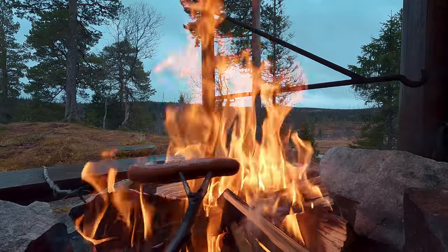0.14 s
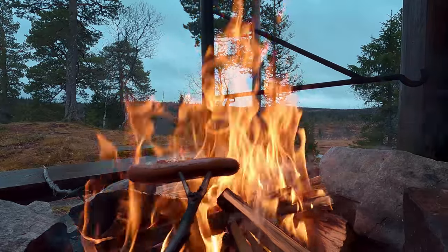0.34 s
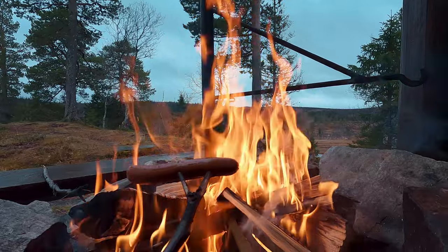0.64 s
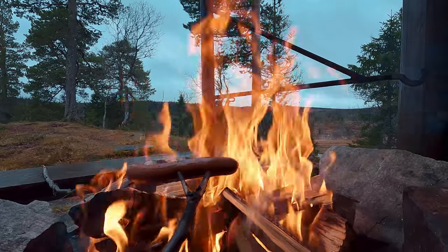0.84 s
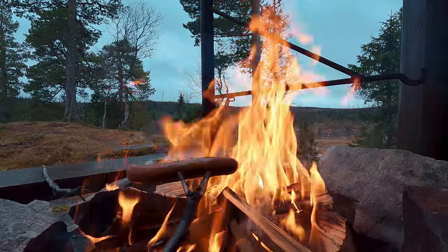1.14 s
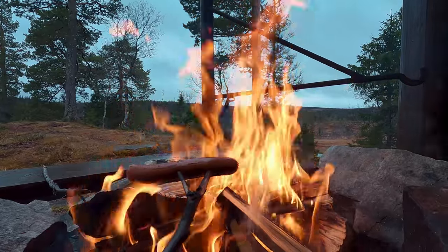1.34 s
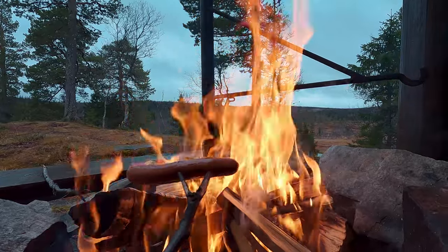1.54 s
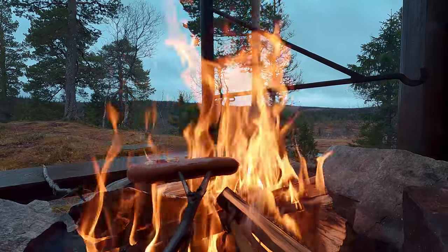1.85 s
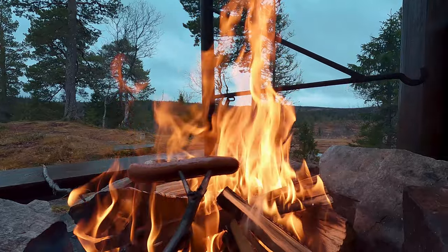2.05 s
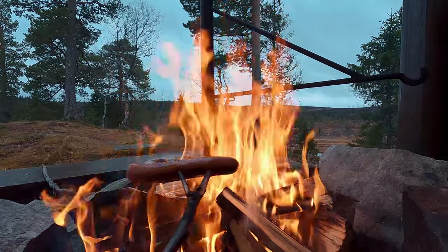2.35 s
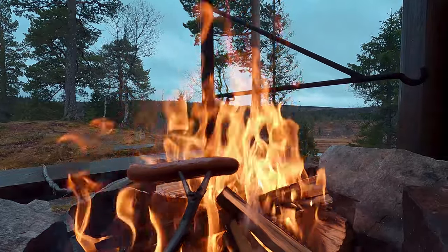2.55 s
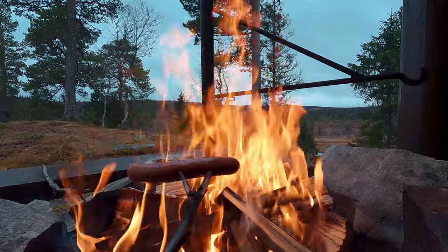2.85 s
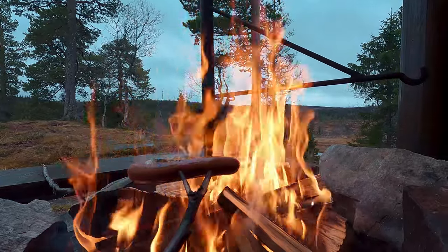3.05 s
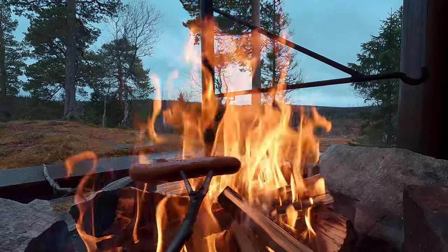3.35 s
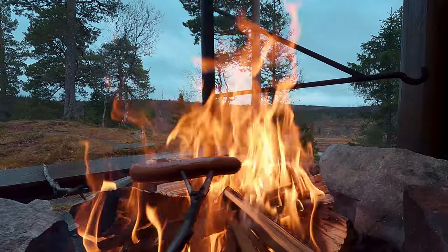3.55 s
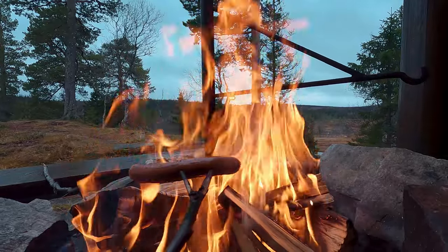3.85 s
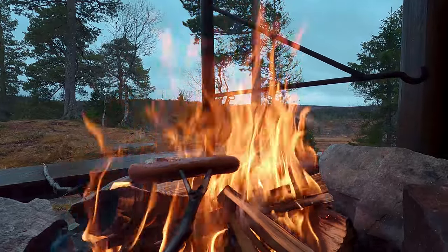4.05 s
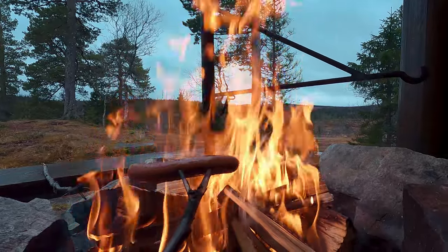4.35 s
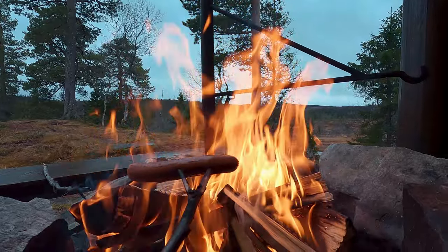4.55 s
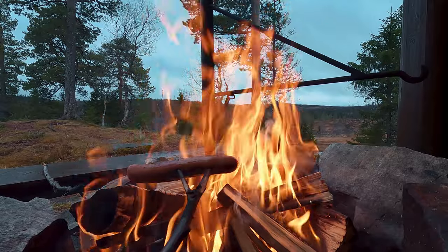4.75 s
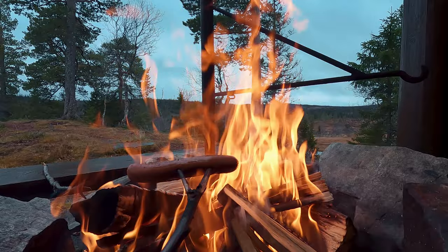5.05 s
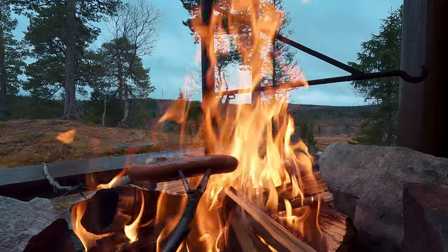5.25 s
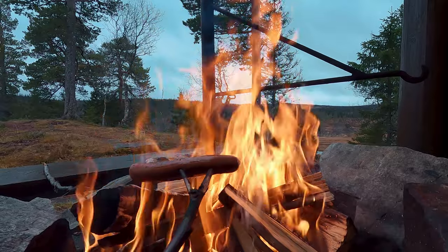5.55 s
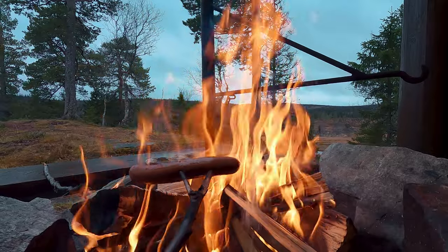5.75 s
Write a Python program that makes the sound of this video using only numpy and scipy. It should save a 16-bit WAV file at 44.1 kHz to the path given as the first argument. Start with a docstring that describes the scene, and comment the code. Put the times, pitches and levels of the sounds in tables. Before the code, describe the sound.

A wood fire burns close to the microphone in an outdoor stone pit. A soft, deep billowing rumble and low flame flutter run throughout, with faint wide sap hiss, a barely perceptible very high whine and a constant bed of tiny ticks. Small pops, some dull and some bright, come about eleven times a second. Sharp snaps crowd the first 0.2 s, then recur at 0.45, 0.64 and in a tight cluster around 1.0-1.1 s with a short sputtering gas spurt. Sparser cracks follow, with faint spurts near 1.5, 2.15 and 3.6 s. A strong snap hits at 2.5 s and by far the loudest, sharp and pitched, at 3.1 s. From 3 s everything fades gradually, though cracks continue, notably at 4.0-4.15, woody knocks near 4.5, a bright snap at 4.8 and a few around 5.05 s, reaching silence at 6 s. Quick stone reflections and a faint tree echo follow the cracks.

```python
"""Outdoor wood fire, close by

A wood fire burns in a stone pit: low flame rumble and flutter from shaped noise, sap hiss from wide noise.
Ticks, pops and loud snaps are short minimum-phase pulses; gas spurts are sputtering, decaying noise.
Delayed copies and decaying noise tails throw the cracks back from stones, logs, ground and trees.
A faint thin whine lies on top; everything fades from 3 s on."""
import sys
import numpy as np
from scipy import signal
from scipy.fft import rfft, irfft
from scipy.io import wavfile
from scipy.ndimage import uniform_filter1d

SR = 44100
rng = np.random.default_rng(int(sys.argv[2]) if len(sys.argv) > 2 else 0)


def wav_record(signal):
    """Record a signal, one row per channel, as 16-bit PCM in the file named by sys.argv[1]."""
    frames = np.transpose(np.atleast_2d(signal))
    bounded = np.clip(frames, -1, 1)
    # unit amplitude maps onto the largest positive 16-bit level
    quanta = np.round(bounded * 32767).astype(np.int16)
    wavfile.write(sys.argv[1], SR, quanta)


N = 260182
TIME_S = np.arange(N) / SR

# Loud wood cracks: (time [s], strength [dB], low knock [dB], mid bite [dB], top fizz [dB],
# pitch [Hz], amplitude of a second pulse one pitch period later [0-1])
SNAPS = [(0.023, -21.5, 5, 4, 0, 3975, 0.3), (0.1035, -11.5, 1, 3.5, -1, 4430, 0.17),
         (0.1413, -18, 10, -1, 7, 5650, 0.2), (0.1507, -14.5, 3.5, 1, -0.5, 2300, 0.15),
         (0.1995, -12, -2.5, -2, -5.5, 4975, 0.1), (0.4074, -24.5, -6, 1, 1, 4000, 0.3),
         (0.4461, -14.5, -9, -1, -4.5, 3900, 0.1), (0.6367, -10.5, -5.5, -0.5, -8, 2040, 0.1),
         (0.652, -24, 12, 10, 2, 4150, 0.2), (0.7396, -23, -1, 0, 0.5, 3225, 0.2),
         (0.8034, -19, 13, 11, 9, 2150, 0.35), (0.915, -20.5, -1, 5, -5, 3575, 0.05),
         (1.009, -14, 0, 6, 3, 3975, 0), (1.026, -17, -4, -9, -5, 2775, 0.2),
         (1.0625, -18.5, -10, -12, -1, 4200, 0.1), (1.0694, -15.5, -6, 6, -5, 2200, 0.5),
         (1.0865, -18, 7.5, 3.5, -1, 2200, 0.25), (1.413, -21, 8, 0, 0.5, 2400, 0.3),
         (1.4768, -20.5, -2, -2.5, 2, 2275, 0.1), (1.7393, -20.5, 6.5, 1, 2, 2525, 0),
         (1.8722, -24, 9, 5, 3, 2300, 0.3), (1.8997, -23.5, 4, -1, 16, 5025, 0.3),
         (2.1493, -16.5, -2.5, -3.5, -10.5, 1925, 0.06), (2.1914, -20.5, -2, -10, -9, 2925, 0.2),
         (2.214, -21, -8, -2, -5, 4375, 0.4), (2.282, -22, -7, 5, -3, 5025, 0.34),
         (2.4392, -22.5, 1, 4.5, 5, 5500, 0.1), (2.4986, -5, -9.5, -5.5, -9.5, 2090, 0.14),
         (2.7717, -12, -6.5, -4.5, -9, 5975, 0.03), (2.9742, -14.3, -6, 1.5, -5, 3430, 0.05),
         (3.05, -18, -20, -3, 1, 5975, 0.1), (3.0993, 4.5, -6.5, -4, -8, 3684, 0.76),
         (3.602, -19.5, -8, -3, 1, 3275, 0.2), (3.6252, -14, -14, -9, -0.5, 5975, 0.14),
         (3.7826, -20.5, -7, -2, -8, 5975, 0.2), (3.8308, -13.5, 9, 9, 5, 2570, 0.3),
         (4.0216, -8, -5.5, -4, -7, 2420, 0.4), (4.066, -19.5, -2, 4, 1, 3125, 0.2),
         (4.112, -10.5, -10.5, -3.5, -3.5, 4580, 0.2), (4.1514, -3.5, -2.5, -5.5, -5, 4325, 0.07),
         (4.2024, -19.5, 4, 2, -1, 2475, 0.2), (4.2713, -21, -7, -9, -5, 4860, 0.1),
         (4.3384, -23.5, 9, 9, -6, 2525, 0.5), (4.4738, -15.5, 26.5, 18, 0, 2500, 0.2),
         (4.4973, -16, 28.5, 17, -8, 2725, 0.35), (4.6696, -16, -4, -5, -7, 2140, 0.14),
         (4.7891, -4.5, -2.5, 4.5, 4, 3220, 0.26), (4.9871, -23, -1, -6, -0.5, 2254, 0.3),
         (5.0532, -12.5, 2, 1.5, 0, 2925, 0.3), (5.0621, -9.5, -5, -7, -13, 2125, 0.36),
         (5.1055, -15, -10.5, -8, -8.5, 2125, 0.2), (5.1643, -21, -0.5, 5, 4, 4175, 0.1),
         (5.412, -12, -7, 1, -6, 5100, 0.07), (5.6255, -10.5, -7, -6, -8.5, 2125, 0.16)]
# Noise colour of the deep billow: (frequency [Hz], density [dB per Hz])
BILLOW_COLOUR = [(14, -23.5), (22, -5), (30, -0.5), (55, 0.5), (78, -2.5), (95, 1), (120, -7), (150, -24),
                 (220, -49)]
# Noise colour of the flame flutter: (frequency [Hz], density [dB per Hz])
FLUTTER_COLOUR = [(80, -19.5), (115, -3.5), (150, -0.5), (240, -6), (320, -9.5), (450, -13.5), (700, -20),
                  (1200, -24.5), (2000, -29), (4000, -38)]
# Noise colour of boiling sap: (frequency [Hz], density [dB per Hz])
HISS_COLOUR = [(700, -21), (1500, -0.5), (3000, 1.5), (7000, 0.5), (15000, -3), (16000, -4.5)]
# Base spectrum of cracking wood: (frequency [Hz], level [dB])
WOOD_COLOUR = [(100, -27.5), (250, -9), (450, 1.5), (750, -4), (1100, 2), (2000, -0.5), (3000, -1.5),
               (4300, -1), (5300, -0.5), (7000, -0.5), (10000, 0), (13500, 0), (15000, -2), (16500, -10.5)]
# Tone of the scattered echoes: (frequency [Hz], level [dB])
ECHO_COLOUR = [(300, -4), (2000, -3), (4000, 0), (7300, -.5), (14500, -3.5), (16000, -8)]
# Bounces off the nearest stones: (delay [s], level [dB])
BOUNCES = [(.0027, -15.5), (.0034, -18)]
# Centres of a crack's knock, bite, core and fizz: (frequency [Hz])
CRACK_BANDS_HZ = [1200, 3700, 7000, 12000]
# Gas spurting from a freshly split log: (start [s], length [s], level [dB])
SPURTS = [(1.01, 0.19, -57), (1.474, 0.15, -60), (2.154, 0.1, -58), (3.616, 0.11, -59)]
# Noise colour of the spurts: (frequency [Hz], density [dB per Hz])
SPURT_COLOUR = [(2000, -8), (4200, -8.5), (5500, -9), (9500, -1.5), (12500, -10), (16000, -10)]

BILLOW_DB, FLUTTER_DB, HISS_DB, TICKS_DB = -42.5, -49.5, -63, -64
POPS_PER_S, POP_LOW_HZ, POP_HIGH_HZ = 11, 1980, 5990
CUTOFF_HZ = 16000


def from_db(db):
    """Decibels to gain."""
    return 10 ** (np.asarray(db) / 20)


def rms_one(x):
    """Scale to an rms of 1."""
    return x / np.sqrt(np.mean(x ** 2) + 1e-20)


def at_hz(points, hz, outside=None):
    """Read a spectrum along a log-frequency axis."""
    knots_hz, db = np.transpose(points)
    return np.interp(np.log(np.maximum(hz, 1)), np.log(knots_hz), db, outside, outside)


def noise(spectrum):
    """Noise of the given colour, rms 1."""
    gain = from_db(at_hz(spectrum, np.fft.rfftfreq(N, 1 / SR), outside=-np.inf))
    white = rng.standard_normal(N)
    return rms_one(irfft(rfft(white) * gain, N))


def drift(rate_hz):
    """Random wander, rms 1: flat from 0.5 Hz to the rate, weaker up to twice that."""
    return noise([(.5, 0), (rate_hz, 0), (2 * rate_hz, -10)])


def steadied(x, span_s):
    """Even out slow swells by dividing by the running rms."""
    power = uniform_filter1d(x ** 2, max(int(span_s * SR), 2))
    return x / np.sqrt(power + 1e-12)


def flames(surge_db, lick_db):
    """Hot gas billows deeply; the tongues of flame flutter above that."""
    billow_gain = from_db(BILLOW_DB + surge_db * drift(6))
    billow = billow_gain * steadied(noise(BILLOW_COLOUR), span_s=.3)
    flutter_gain = from_db(FLUTTER_DB + lick_db * drift(16))
    flutter = flutter_gain * noise(FLUTTER_COLOUR)
    return billow + flutter


def sap_hiss(swell_db):
    """Boiling sap hisses as wide noise that swells slightly."""
    return from_db(HISS_DB + swell_db) * noise(HISS_COLOUR)


def whine(centre_hz, width_hz, db):
    """Thin steady noise band at the very top."""
    edges_hz = [centre_hz - width_hz / 2, centre_hz + width_hz / 2]
    narrow = signal.butter(1, edges_hz, "band", fs=SR, output="sos")
    return from_db(db) * rms_one(signal.sosfilt(narrow, rng.standard_normal(N)))


def sudden(gain):
    """Minimum-phase spectra of these magnitudes: nothing sounds before the onset."""
    cepstrum = irfft(np.log(gain))
    half = cepstrum.shape[-1] // 2
    # fold the cepstrum onto positive time
    cepstrum[:, 1:half] *= 2
    cepstrum[:, half + 1:] = 0
    return np.exp(rfft(cepstrum))


def placed(pulses, times_s):
    """Lay each pulse on the timeline."""
    out = np.zeros(N + pulses.shape[1])
    starts = np.clip(times_s * SR, 0, N).astype(int)
    for pulse, start in zip(pulses, starts):
        out[start:start + len(pulse)] += pulse
    return out[:N]


def cracks(colours_db, pitch_hz, second, hollow_db):
    """One broadband pressure pulse per (knock, bite, fizz) row; a second give lends it a pitch."""
    size = 512
    hollow_octaves, tear_s, tear_share, tear_stages = 0.22, .00026, 0.58, 3
    count = len(colours_db)
    hz = np.fft.rfftfreq(size, 1 / SR)
    tint_db = np.array([at_hz(list(zip(CRACK_BANDS_HZ, (knock, bite, 0, fizz))), hz)
                        for knock, bite, fizz in colours_db])

    # the opened hollow resonates somewhere between bite and fizz
    hollow_hz = rng.uniform(CRACK_BANDS_HZ[1], CRACK_BANDS_HZ[-1], (count, 1))
    octaves_off = np.log2((hz + 1) / hollow_hz)
    tint_db = tint_db + hollow_db / (1 + (octaves_off / hollow_octaves) ** 2)
    tints = np.array([rms_one(tint) for tint in from_db(tint_db)])
    spectra = sudden(from_db(at_hz(WOOD_COLOUR, hz)) * tints)

    # tearing fibres smear the pulse without changing its colour: all-passes
    lags_s = tear_s * rng.uniform(.2, 1, (count, tear_stages))
    for lag_s in lags_s.T:
        late = np.exp(-2j * np.pi * np.outer(np.ceil(lag_s * SR) / SR, hz))
        spectra *= (late - tear_share) / (1 - tear_share * late)

    second = second[:, None]
    one_period_later = np.exp(-2j * np.pi * np.outer(1 / pitch_hz, hz))
    spectra *= (1 + second * one_period_later) / np.sqrt(1 + second ** 2)
    return irfft(spectra)


def ticks(per_s, spread_db, colour_db, knock_db, fizz_db, lowest_hz=1900):
    """Tiny cells burst at random, many faint, few sharper, each with its own colour and pitch; rms 1."""
    number = int(per_s * N / SR)
    when, size_draw, pitch_draw, second, *tints = rng.random((number, 7)).T
    colours_db = np.array([knock_db, 0, fizz_db]) + colour_db * (2 * np.transpose(tints) - 1)
    sizes = from_db(-spread_db * np.log(0.054 + size_draw))
    pitch_hz = lowest_hz * 2 ** (2 * pitch_draw)  # over two octaves
    pulses = sizes[:, None] * cracks(colours_db, pitch_hz, second, hollow_db=8)
    return rms_one(placed(pulses, when * N / SR))


def pops(db, spread_db, dull_db, colour_db, knock_db, fizz_db, second):
    """Small cracks at uneven intervals, from dull knocks to bright ticks, each with its own pitch."""
    number = int(POPS_PER_S * N / SR)
    jitter, size_draw, dullness, pitch_draw, *tints = rng.uniform(-1, 1, (number, 7)).T
    times_s = (np.arange(number) + .5 + jitter) * N / SR / number
    colours_db = np.array([knock_db, 0, fizz_db]) + colour_db * np.transpose(tints)
    colours_db = colours_db + dull_db * np.outer(dullness, [1, 1, 0])  # knock and bite together
    pitch_hz = POP_LOW_HZ * (POP_HIGH_HZ / POP_LOW_HZ) ** ((pitch_draw + 1) / 2)
    pulses = cracks(colours_db, pitch_hz, np.full(number, second), hollow_db=6.0)
    gains = from_db(db + spread_db * size_draw)
    return placed(gains[:, None] * pulses, times_s)


def snaps(throw_db_per_db):
    """Bursting cells snap loudly: direct sound, and the feed to the surroundings, which favours big ones."""
    times_s, db, knock_db, bite_db, fizz_db, pitch_hz, second = np.transpose(SNAPS)
    colours_db = np.transpose([knock_db, bite_db, fizz_db])
    pulses = from_db(db)[:, None] * cracks(colours_db, pitch_hz, second, hollow_db=2.0)
    throw_gains = from_db(throw_db_per_db * db)
    return placed(pulses, times_s), placed(pulses * throw_gains[:, None], times_s)


def scatter(x, db, t60_s, build_s):
    """Countless small echoes, as a noise response of unit energy that builds up and dies away."""
    t = TIME_S[:SR]
    build_up = (1 - np.exp(-t / build_s)) ** 2
    decay = from_db(-60 * t / t60_s)
    response = noise(ECHO_COLOUR)[:SR] * build_up * decay
    response = response / np.sqrt(np.sum(response ** 2))
    return from_db(db) * signal.fftconvolve(x, response)[:N]


def fire_pit(x):
    """Direct sound, clear bounces off the nearest stones, short rattle of echoes between the logs."""
    bounces = sum(from_db(db) * np.pad(x, (int(delay_s * SR), 0))[:N] for delay_s, db in BOUNCES)
    return x + bounces + scatter(x, db=-7.5, t60_s=0.02, build_s=0.001)


def surroundings(x):
    """Ground and posts answer soon, the trees faintly and longer."""
    near = scatter(x, db=-10.5, t60_s=0.18, build_s=0.0031)
    far = scatter(x, db=-23, t60_s=.75, build_s=.03)
    return near + far


def spurts(sputter_db):
    """Trapped gas rushes out with a sputtering hiss that sinks as the pressure is spent."""
    flow = np.zeros(N)
    for start_s, length_s, db in SPURTS:
        knots_s = [start_s, start_s + .005, start_s + 0.0046 + length_s]
        pressure = np.interp(TIME_S, knots_s, [0, 1, 0])
        flow += from_db(db) * np.sqrt(pressure)
    return flow * from_db(sputter_db * drift(120)) * noise(SPURT_COLOUR)


def scene():
    """Snaps, pops and ticks echo in the pit; hiss, gas spurts, flames and whine stay dry."""
    swell_db = 0.5 * drift(4)  # shared by hiss and ticks
    rumble = flames(surge_db=1.03, lick_db=1.3)
    hiss = sap_hiss(swell_db)
    thin = whine(centre_hz=15500, width_hz=60, db=-69.5)
    tick_train = ticks(per_s=150, spread_db=7.5, colour_db=5, knock_db=0.0, fizz_db=-2.5)
    fine = from_db(TICKS_DB + swell_db) * tick_train
    small = pops(db=-27.5, spread_db=2.5, dull_db=9, colour_db=5.5, knock_db=0, fizz_db=-2.0, second=.4)
    direct, thrown = snaps(throw_db_per_db=0.13)
    crackle = fire_pit(direct + small + fine) + surroundings(thrown + from_db(-7.5) * small)
    gas = spurts(sputter_db=2.5)
    return (rumble + hiss + thin + crackle + gas)[None]


def record(dry):
    """Fade the level towards the end, then cut the top with a steep low-pass."""
    fade = np.clip((6.03 - TIME_S) / 3.03, 0, 1) ** 1.8
    low_pass = signal.ellip(10, .2, 80, CUTOFF_HZ, fs=SR, output="sos")
    return signal.sosfilt(low_pass, dry * fade)


dry = scene()
out = record(dry)
wav_record(out)
```